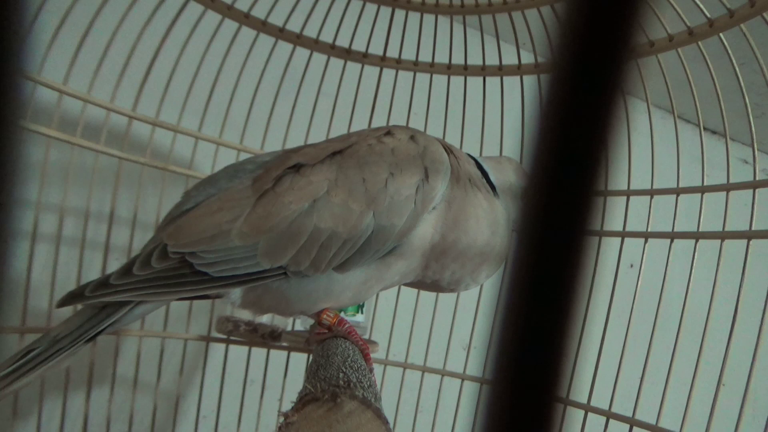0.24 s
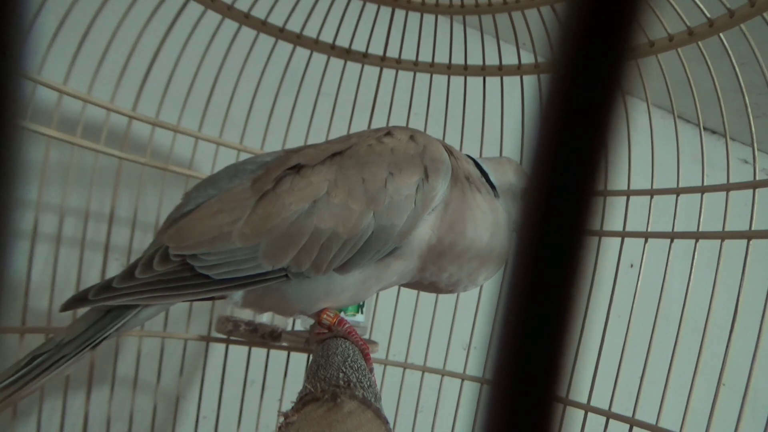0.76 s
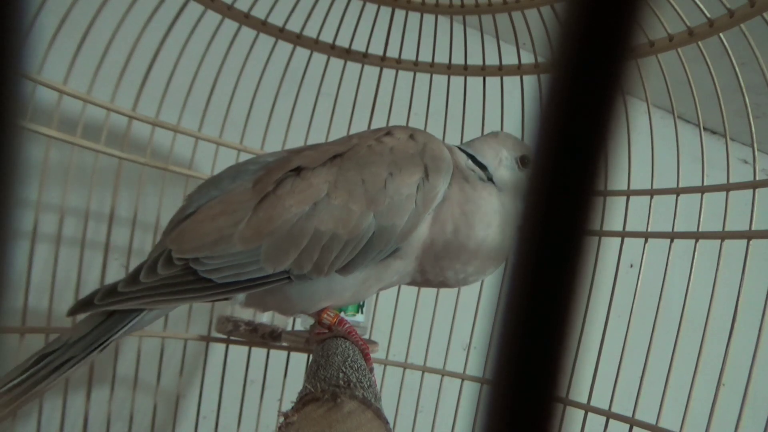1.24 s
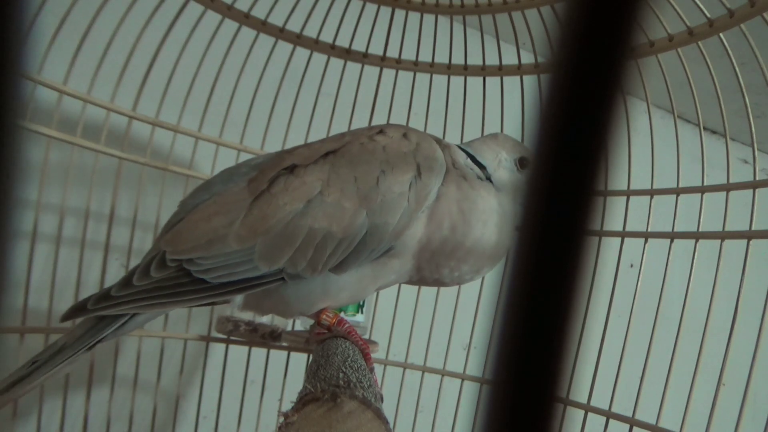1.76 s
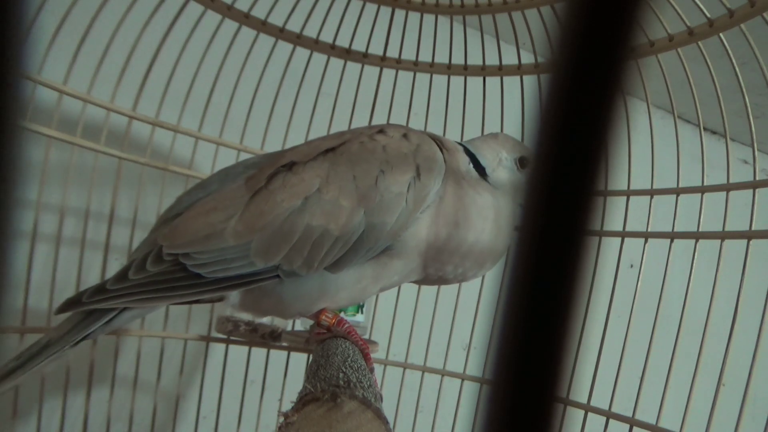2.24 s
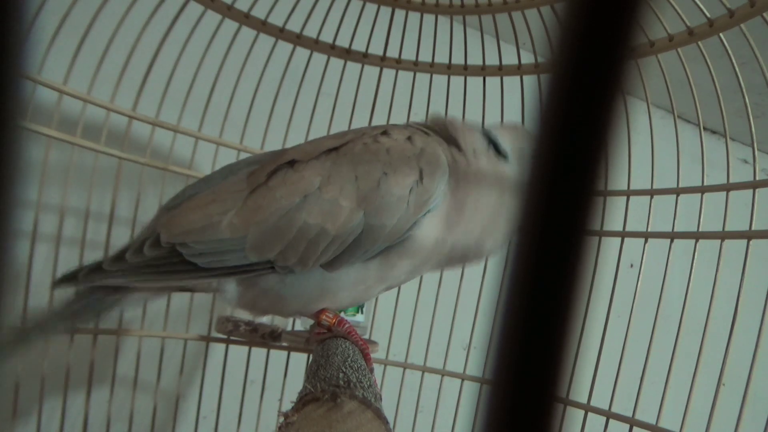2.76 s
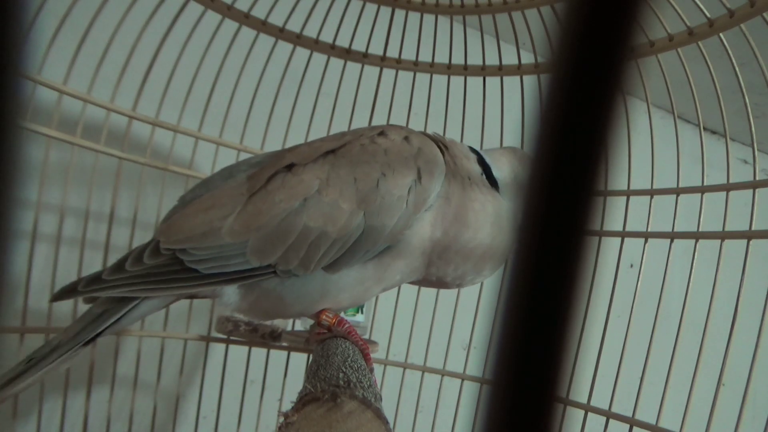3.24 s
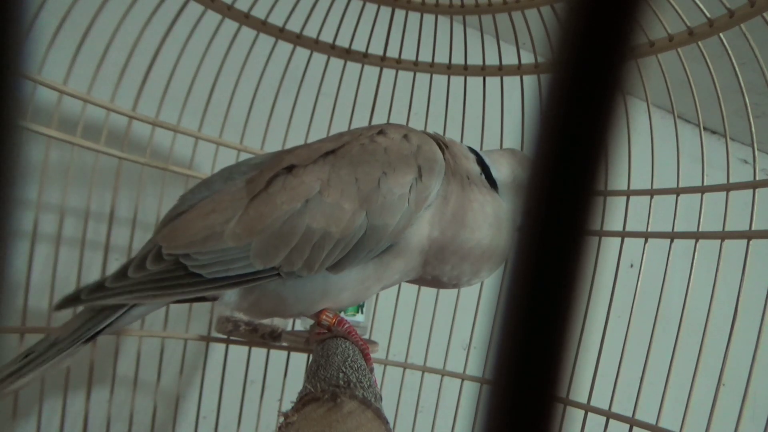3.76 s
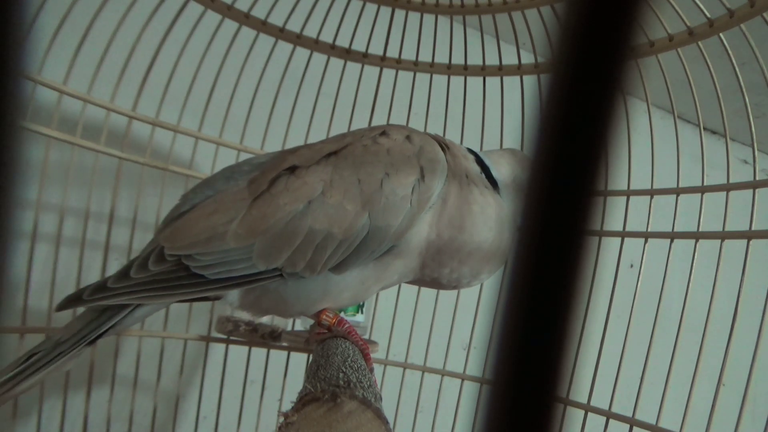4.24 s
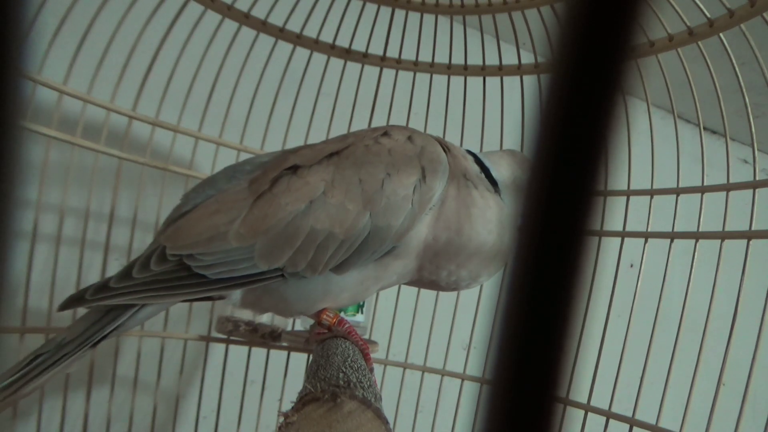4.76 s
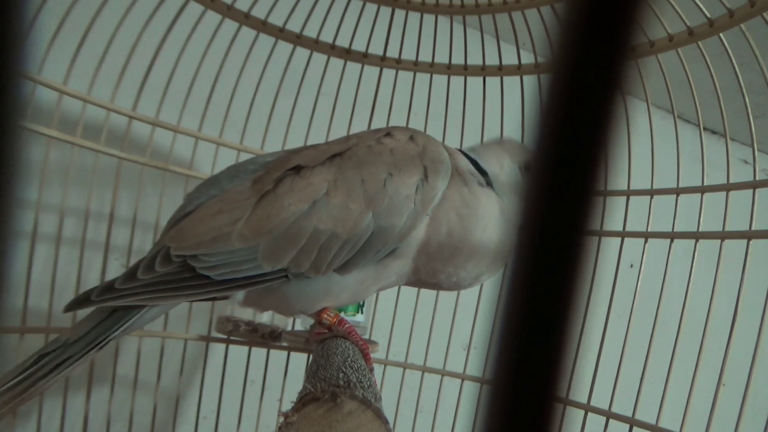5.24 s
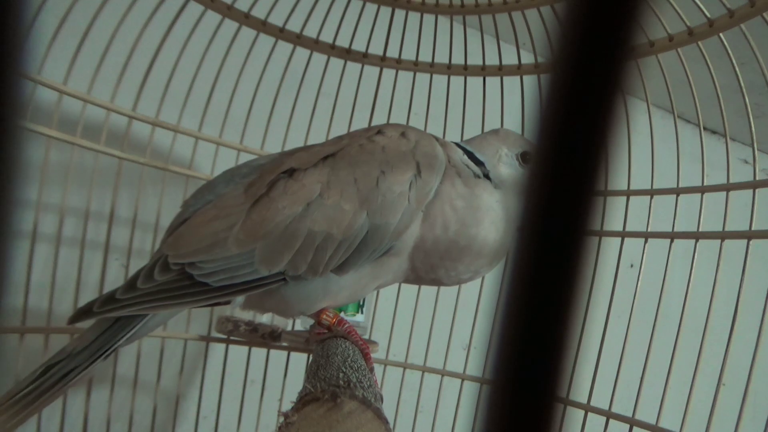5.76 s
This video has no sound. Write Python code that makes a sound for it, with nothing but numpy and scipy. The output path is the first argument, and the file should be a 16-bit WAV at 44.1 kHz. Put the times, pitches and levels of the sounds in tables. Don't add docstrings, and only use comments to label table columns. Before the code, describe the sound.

A caged dove gives a long smooth coo sinking in pitch, two rasping breaths, a short note, a throbbing trill and another long falling coo.

```python
import sys
import numpy as np
from scipy import signal
from scipy.fft import rfft, irfft, next_fast_len
from scipy.io import wavfile
from scipy.ndimage import uniform_filter1d, map_coordinates

SR = 44100
rng = np.random.default_rng(int(sys.argv[2]) if len(sys.argv) > 2 else 0)


def file_out(sig):
    cols = np.atleast_2d(sig).T
    lim = np.clip(cols, -1, 1)
    pcm = np.round(lim * 32767).astype(np.int16)
    wavfile.write(sys.argv[1], SR, pcm)


def field_ratio(decibels):
    return 10 ** (np.asarray(decibels, dtype=float) / 20)


N = 264820
REPEAT_S, LEAD_S = 4.35, 1.7

# time_s, pitch_hz, fundamental_db, overtone_db
FIRST_NOTE = [(0.0, 525.5, -12, -57), (0.06, 526.0, -10.5, -46), (0.274, 528.2, -12.5, -46),
              (0.298, 530.1, -11, -42), (0.316, 532.1, -10.5, -46.5), (0.602, 530.6, -10, -44.5),
              (0.704, 524.7, -12, -46.5), (0.826, 523.6, -10.5, -47), (0.94, 522.4, -10.5, -44.5),
              (0.972, 520.8, -9, -47.5), (0.986, 519.1, -9.5, -44), (1.118, 515.4, -14, -44.5),
              (1.19, 513.8, -6.5, -44), (1.272, 503.7, -10, -47), (1.28, 501.7, -8, -50)]
SHORT_NOTE = [(2.82, 569.8, -10, -47), (2.85, 572.4, -10, -45.5), (2.862, 554, -9.5, -54),
              (2.888, 549.7, -7.5, -46.5), (2.955, 533.3, -11.5, -54)]
SECOND_NOTE = [(3.885, 552.8, -12, -46), (3.911, 553.4, -9.5, -46), (3.991, 540, -14, -49),
               (4.023, 538.8, -9, -47.5), (4.069, 533.2, -12, -44.5), (4.113, 531.2, -7, -45.5),
               (4.225, 526.4, -12.5, -46.5), (4.743, 526.9, -12, -44.5), (4.855, 529.2, -13, -44.5),
               (4.909, 528.4, -13, -44), (4.955, 527.1, -13, -43.5), (5.115, 525.8, -12.5, -45),
               (5.241, 522, -9, -45.5), (5.337, 513.9, -14.5, -44.5), (5.377, 510, -7, -42.5),
               (5.457, 503.8, -11, -46.5), (5.481, 503.5, -7.5, -45.5), (5.5, 499, -6.5, -54.5)]
# time_s, pitch_hz, fundamental_db, overtone_db
LOW_REGISTER = [
    [(1.30, 494.2, -6, -48), (1.34, 484.4, -10.5, -51.5), (1.385, 465.4, -9, -50),
     (1.405, 426, -10.5, -59.5), (1.43, 412.6, -10.5, -55), (1.56, 400.6, -24.5, -52),
     (1.64, 389, -28, -67.5)],
    [(2.775, 405.7, -39.5, -67.5), (2.79, 429.7, -9.5, -48), (2.803, 443.6, -8.5, -47.5),
     (2.812, 572.3, -9, -49)],
    [(3.825, 410.7, -25, -56.5), (3.85, 420, -14, -54.5), (3.86, 470.8, -7, -54.5),
     (3.872, 545.6, -13, -46)],
    [(5.56, 493.8, -10.5, -47.5), (5.62, 490.5, -9.5, -52), (5.69, 476.6, -10, -52.5),
     (5.735, 460.2, -10.5, -55), (5.755, 420, -8, -56), (5.85, 408.6, -16, -56), (5.95, 397.6, -24.5, -57),
     (6.02, 396.3, -26, -59.5)],
]
# start_s, length_s, pitch_hz, end_pitch_hz, fundamental_db, overtone_db
TRILL_THROBS = [(3.264, .015, 429.5, 420, -33, -64.5), (3.30, .015, 430, 420, -35, -61.5),
                (3.391, 0.018, 429.3, 420, -26, -60.5), (3.419, .012, 430, 420, -29, -57.5),
                (3.448, .01, 428, 420, -27.5, -59.5), (3.489, .014, 429.6, 415, -19, -58.5),
                (3.531, .02, 426, 414, -19, -56.5), (3.576, 0.034, 425.2, 415.8, -16, -56.5),
                (3.634, 0.048, 426, 415, -15.5, -53.5), (3.699, .056, 429.3, 412, -13.5, -55),
                (3.781, .026, 530, 476, -10, -52), (3.811, .012, 420, 408.7, -24, -54.5)]
# centre_hz, width_hz, level_db
WINDPIPE_MODES = [(1100, 230, -9), (1582, 300, 1), (2170, 180, -17.5), (4800, 450, -20),
                  (9500, 1200, -28.5)]
# time_s, centre_hz
BEAK_PATH = [(0, 6854), (0.899, 6630), (1.05, 7650), (1.4, 7510), (2.8, 8340), (3, 8220), (3.9, 8290),
             (4.099, 7980), (4.201, 6890), (5.1, 6700), (5.25, 7750), (5.7, 7500)]
# centre_hz, width_hz, level_db
SAC_MODES = [(420, 24, 0.5), (716, 130, -25.5)]

# frequency_hz, density_db (per Hz)
RUMBLE_SPECTRUM = [(12, -40.5), (20, -18), (81, 2.5), (130, 0), (163, -1.5), (226, -11.5), (256, -6),
                   (300, -13), (390, -34), (660, -120)]
# time_s, level_db
RUMBLE_SWELL = [(0.0, -45), (0.1, -51), (0.92, -50.5), (1.72, -51.5), (1.85, -50), (2.67, -57.5),
                (2.71, -51.5), (3.36, -55.5), (4.55, -51.5), (4.96, -54.5), (5.1, -50), (5.71, -55.5),
                (6.0, -50.5)]
# frequency_hz, likeness (-1 to 1)
RUMBLE_LIKENESS = [(25, .5), (60, 0.076), (110, -0.044), (180, -0.0077), (280, 0.34)]
# frequency_hz, density_db (per Hz)
HISS_SPECTRUM = [(250, -21.5), (400, -11), (700, -6.5), (1100, -9), (1600, -9), (2100, -15.5), (3000, -16),
                 (4800, -17.5), (5600, -21.5), (9000, -22), (11500, -24), (15500, -30)]
# frequency_hz, likeness (-1 to 1)
DIFFUSE_LIKENESS = [(300, 0.74), (550, 0.74), (1000, 0.37), (2000, 0.32), (5000, 0.88), (9000, 0.89),
                    (15000, .99)]

# start_s, peak_db, centre_hz, treble_db
CLAW_TICKS = [(0.0257, -38, 2648, -19), (0.13, -43, 2602, -13.5), (1.4396, -46.5, 2720, -19.5),
              (1.9162, -42, 2417, -22), (1.9376, -42, 3330, -20.5), (2.1037, -47, 2600, -12.5),
              (2.4035, -43, 2643, -13), (2.5284, -47.5, 3980, -15.5), (2.6597, -48.5, 3960, -19),
              (2.705, -49, 3804, -17.5), (3.6866, -50.5, 2438, -1), (3.8831, -44, 2728, -20),
              (4.8989, -38, 3336, -20.5), (4.9401, -43.5, 3900, -17), (5.3128, -40.5, 2990, -15.5),
              (5.5327, -42.5, 3946, -17.5), (5.6094, -51, 2420, -7.5), (5.9897, -41, 3430, -24)]
# start_s, length_s, pitch_hz, end_pitch_hz, level_db, octave_db
FAR_WHISTLES = [(0.204, 0.076, 4470, 4500, -51.5, -3), (0.239, 0.049, 2250, 2900, -50, 4),
                (0.262, 0.044, 2850, 2880, -56, -1.5), (.29, 0.05, 3660, 4100, -51, -7),
                (.33, 0.048, 3200, 3500, -51, -9), (.365, 0.058, 3395, 3860, -49, -13.5),
                (0.383, 0.045, 5140, 5000, -49.5, -6), (0.389, 0.057, 4270, 4630, -55.5, -3),
                (0.587, .03, 3350, 3030, -57.5, -22), (0.613, 0.043, 3080, 3500, -44.5, -11),
                (0.639, 0.058, 3100, 3220, -57.5, -5), (.663, 0.032, 4300, 4800, -43, -13.5),
                (.675, .04, 4550, 4500, -55, -14.5), (.72, 0.026, 2500, 2640, -62, -6),
                (0.737, .05, 4300, 4000, -59.5, -6)]

# time_s, pulse_rate_hz, level_db, whistle_db
INTAKE_BREATHS = [
    [(1.70, 190.7, -51, -82), (1.79, 203, -38.5, -73), (1.87, 188.7, -37, -77.5), (1.95, 181, -37, -76),
     (2.1, 172.5, -38, -78.5), (2.22, 167.6, -40, -80.5), (2.3, 160, -57, -84)],
    [(2.44, 125, -66.5, -86), (2.47, 130.2, -43, -64), (2.53, 128.8, -42, -64), (2.58, 118.5, -40, -63.5),
     (2.68, 117.4, -45, -67.5), (2.73, 115.2, -63.5, -77)],
]
# frequency_hz, gain_db
OPEN_THROAT = [
    [(150, -28), (300, -10.5), (370, -1), (580, 4), (700, -2), (850, -14), (1000, -19.5), (1150, -32),
     (1500, -20.5), (2200, -41)],
    [(150, -29), (300, -14), (360, -1), (600, -6.5), (780, 2), (850, 0), (980, -11), (1150, -29.5),
     (1600, -23), (2200, -41.5)],
]
# centre_hz, width_hz, level_db
NOSTRIL_MODES = [(4950, 250, -1), (7600, 350, -2)]

# frequency_hz, t60_s
REVERB_TIME = [(300, 2.8), (500, 2.88), (1600, 1.4), (4500, 0.33), (10000, 0.44)]
# frequency_hz, level_db
ECHO_STRENGTH = [(300, -5), (550, -6.5), (1600, -6), (4500, -5), (10000, -9)]
# frequency_hz, difference_db
LEFT_LEAN = [(60, 2), (110, 3), (200, 1), (380, 2.5), (700, 3.5), (1280, 3), (2370, 2.5), (4370, 2),
             (8060, -0.5), (14900, -0.5)]


def along(points, hz):
    f, v = np.transpose(points)
    return np.interp(np.log(hz + 1), np.log(f + 1), v)


def unit(x):
    return x / np.sqrt(np.mean(x ** 2) + 1e-20)


def add(track, start_s, x):
    part = track[..., round(start_s * SR):][..., :x.shape[-1]]
    part += x[..., :part.shape[-1]]


def curves(rows):
    time_s, *columns = np.transpose(rows)
    t = np.arange(time_s[0], time_s[-1], 1 / SR)
    return [np.interp(t, time_s, column) for column in columns]


def wobble(n, rate_hz):
    knots = rng.standard_normal(int(n * rate_hz / SR) + 4)
    return map_coordinates(knots, [np.arange(n) * rate_hz / SR])


def modes(table, f):
    total = 0
    for k, (centre, width, db) in enumerate(table):
        damping = 1j * f * width
        total = total + (-1) ** k * field_ratio(db) * damping / (centre * centre - f * f + damping)
    return total


def filtered(x, response):
    m = next_fast_len(x.shape[-1] + 8192)
    spectrum = rfft(x, m) * response(np.fft.rfftfreq(m, 1 / SR))
    return irfft(spectrum, m)[..., :x.shape[-1]]


def pair(x, likeness):
    def mid_side(hz):
        angle = np.arccos(np.clip(along(likeness, hz), -1, 1)) / 2
        return np.array([np.cos(angle), np.sin(angle)])

    mid, side = filtered(x, mid_side)
    return np.array([mid + side, mid - side])


def fade(n, edge_s):
    i = np.arange(n)
    return np.sin(np.pi / 2 * np.clip(np.minimum(i, n - i) / (edge_s * SR), 0, 1)) ** 2


def sing(rows, edge_s):
    hz, db, over_db = uniform_filter1d(curves(rows), size=300, axis=1, mode="nearest")
    n = len(hz)
    song_s = (rows[0][0] + np.arange(n) / SR) % REPEAT_S
    beak_hz = np.interp(song_s, *np.transpose(BEAK_PATH[:9]))
    resonances = WINDPIPE_MODES + [(beak_hz, 500, -22)]
    phase = 2 * np.pi * np.cumsum(hz * (1 + 0.0011 * wobble(n, 40))) / SR

    overtones = np.zeros(n)
    for k in range(2, 22):
        leak = sum(abs(modes([m], k * hz)) ** 2 / field_ratio(m[2]) for m in resonances)
        overtones += leak * field_ratio(0.73 * wobble(n, 14)) * np.sin(k * phase + k * k)

    breath = filtered(rng.standard_normal(n) * (1 + np.sin(phase)), lambda f: modes(WINDPIPE_MODES, f))
    murmur = filtered(rng.standard_normal(n), lambda f: modes(SAC_MODES, f) * modes([(495, 430, 0)], f))
    fundamental = field_ratio(db) * (np.sin(phase) + field_ratio(-37.5) * unit(murmur))
    leakage = field_ratio(over_db) * (overtones + field_ratio(-4.5) * breath)
    return np.sqrt(2) * (fundamental + leakage) * fade(n, edge_s)


def coos():
    out = np.zeros(N + round(LEAD_S * SR))

    def earlier(rows):
        return [(s - REPEAT_S, *rest) for s, *rest in rows if s < REPEAT_S - .05]

    first = [*FIRST_NOTE, *LOW_REGISTER[0]]
    short = [*LOW_REGISTER[1], *SHORT_NOTE]
    second = [*LOW_REGISTER[2], *SECOND_NOTE, *LOW_REGISTER[3]]
    for rows in (earlier(short), [*earlier(second), *first], short, second):
        rows = np.array(rows)
        rows[:, 0] = np.maximum.accumulate(rows[:, 0])
        add(out, LEAD_S + rows[0, 0], sing(rows, edge_s=0.015))

    for s, length, hz, end_hz, db, over_db in TRILL_THROBS:
        ends = [(s, hz, db, over_db), (s + length + 0.011, end_hz, db - 3, over_db)]
        throb = sing(ends, edge_s=.009)
        add(out, LEAD_S + s - .003, throb)
        add(out, LEAD_S + s - .003 - REPEAT_S, throb)
    return out


def air():
    low = filtered(rng.standard_normal((2, N)), lambda hz: field_ratio(along(RUMBLE_SPECTRUM, hz)))
    high = filtered(rng.standard_normal((2, N)), lambda hz: field_ratio(along(HISS_SPECTRUM, hz)))
    swell_db = np.interp(np.arange(N) / SR, *np.transpose(RUMBLE_SWELL))
    rumble = field_ratio(swell_db + 3.5) * unit(pair(low, RUMBLE_LIKENESS))
    hiss = field_ratio(-56.5) * unit(pair(high, DIFFUSE_LIKENESS))
    return rumble + hiss


def ticks():
    out, t = np.zeros(N), np.arange(SR // 20) / SR
    for s, db, hz, treble_db in CLAW_TICKS:
        envelope = field_ratio(-60 * t / 0.054) * (1 - np.exp(-t / 0.00086))
        impact = envelope * rng.standard_normal(len(t))

        def perch(f):
            body = modes([(hz, 1800, 0)], f) * modes([(3500, 2500, 0.0018)], f)
            return body + modes([(9500, 4000, treble_db - 5)], f)

        add(out, s - .001, field_ratio(db + 6.5) * filtered(impact, perch))
    return out


def twitter():
    out = np.zeros(N)
    for s, length, hz, end_hz, db, octave_db in FAR_WHISTLES:
        n = round(length * SR)
        glide_hz = np.linspace(hz, end_hz, n) * (1 + 0.011 * wobble(n, 300))
        phase = 2 * np.pi * np.cumsum(glide_hz) / SR
        hoarse = 1.2 + wobble(n, 500)
        whistle = hoarse * (np.sin(phase) + field_ratio(octave_db - 1.5) * np.sin(2 * phase))
        puff = filtered(rng.standard_normal(n), lambda f: modes([(hz, 1500, -3), (9500, 4000, -11)], f))
        add(out, s, field_ratio(db) * fade(n, 0.0057) * (whistle + puff))
    return out


def intakes():
    out = np.zeros(N)
    for rows, throat in zip(INTAKE_BREATHS, OPEN_THROAT):
        hz, db, whistle_db = curves(rows)
        n = len(hz)
        phase = 2 * np.pi * np.cumsum(hz * (1 + 0.0048 * wobble(n, 60))) / SR
        voiced = np.zeros(n)
        for k in range(1, 16):
            voiced += field_ratio(along(throat, k * hz) + 2.3 * wobble(n, 15)) * np.cos(k * phase)
        gated = rng.standard_normal(n) * (1 + np.cos(phase))
        rasp = unit(filtered(gated, lambda f: field_ratio(along(throat, f))))
        whistle = unit(filtered(gated, lambda f: modes(NOSTRIL_MODES, f) ** 2))
        breath = field_ratio(db) * (unit(voiced) + 0.37 * rasp) + field_ratio(whistle_db) * whistle
        add(out, rows[0][0], fade(n, .02) * breath)
    return out


def room(x):
    hz, t, z = signal.stft(rng.standard_normal((2, 3 * SR)), SR, nperseg=256)
    decay = field_ratio(-60 * t / along(REVERB_TIME, hz)[:, None])
    decay *= 1 - np.exp(-t / 0.024)
    energy = np.sum(decay ** 2, axis=1) * 128
    decay *= (field_ratio(along(ECHO_STRENGTH, hz)) / np.sqrt(energy))[:, None]
    tail = pair(signal.istft(z * decay, SR, nperseg=256)[1], DIFFUSE_LIKENESS)
    delayed = np.pad(x, (400, 0))
    return signal.fftconvolve(delayed[None], tail, axes=1)[:, :len(x)]


def scene():
    lead = round(LEAD_S * SR)
    near = coos() + np.pad(intakes() + ticks(), (lead, 0))
    far = np.pad(twitter(), (lead, 0))
    heard = near + far + room(near + field_ratio(4) * far)
    heard = heard[:, lead:] + air()
    return filtered(heard, lambda hz: field_ratio(along(LEFT_LEAN, hz) * np.array([[.5], [-.5]])))


def band_limit(x):
    return signal.sosfilt(signal.butter(12, 15480, fs=SR, output="sos"), x)


def record(dry):
    mix = np.clip(dry, -1, 1)
    return band_limit(mix)


dry = scene()
out = record(dry)
file_out(out)
```